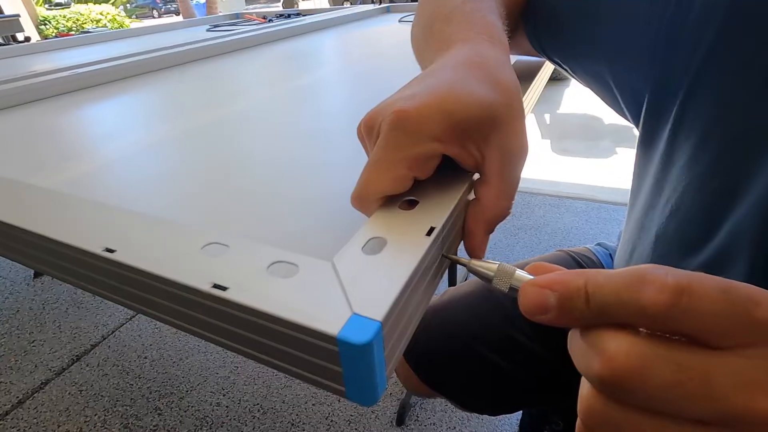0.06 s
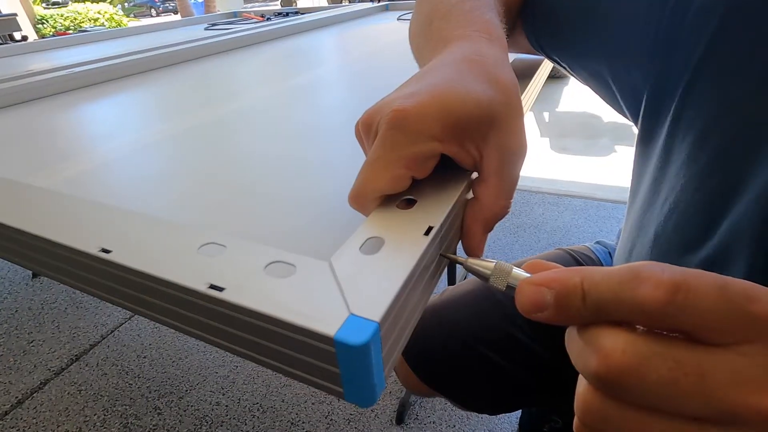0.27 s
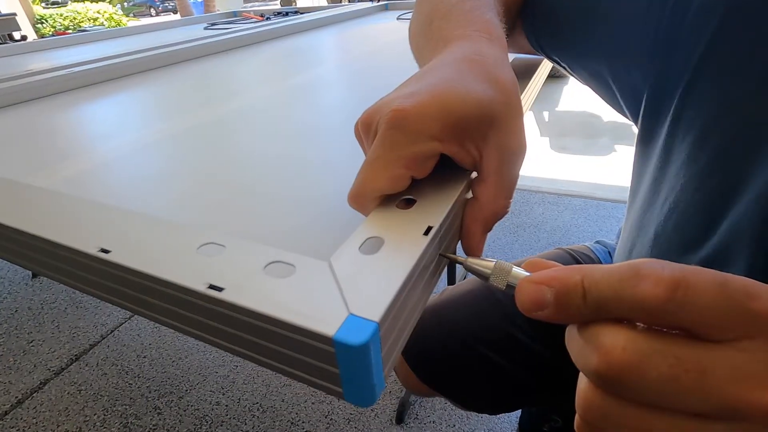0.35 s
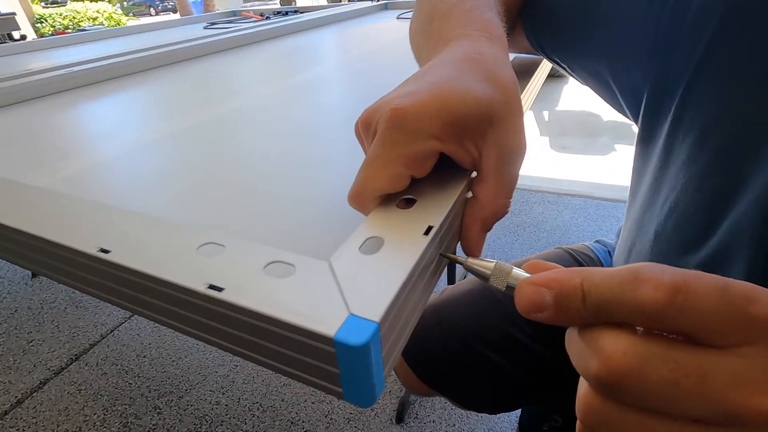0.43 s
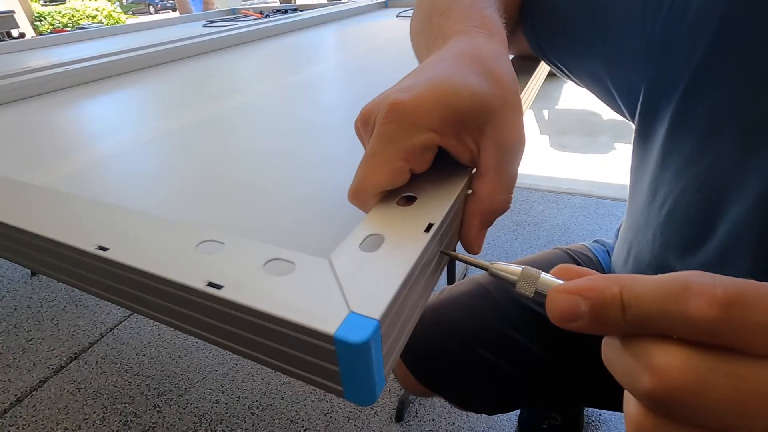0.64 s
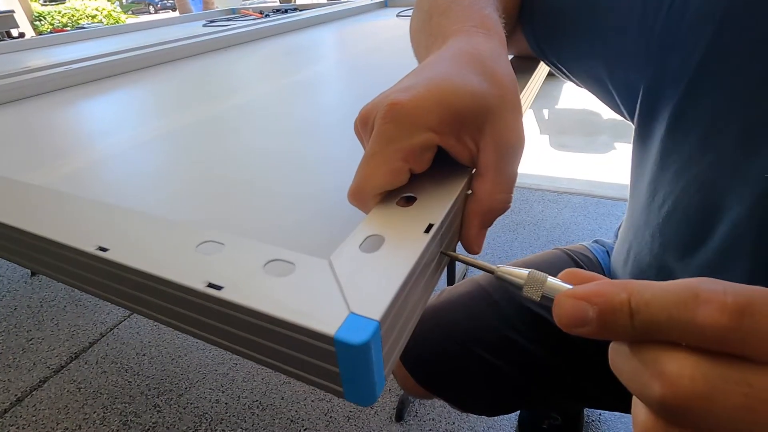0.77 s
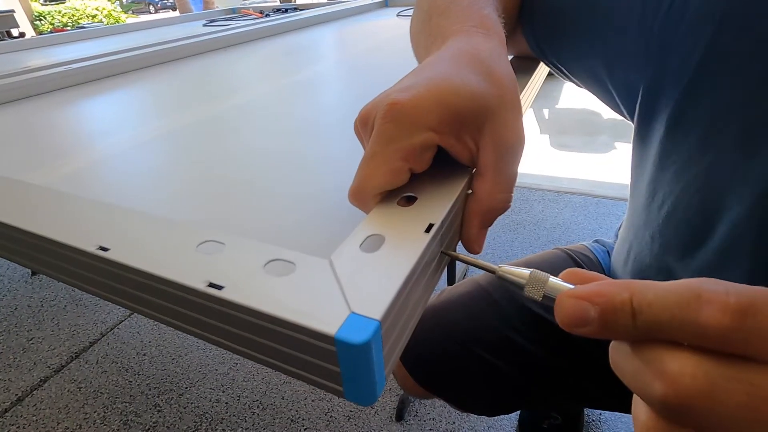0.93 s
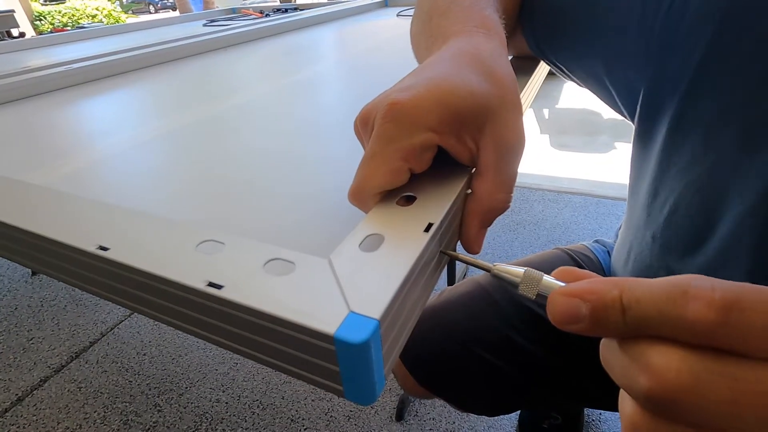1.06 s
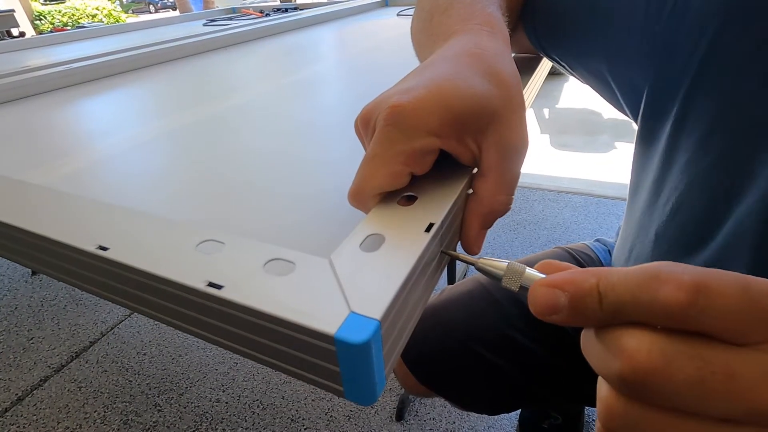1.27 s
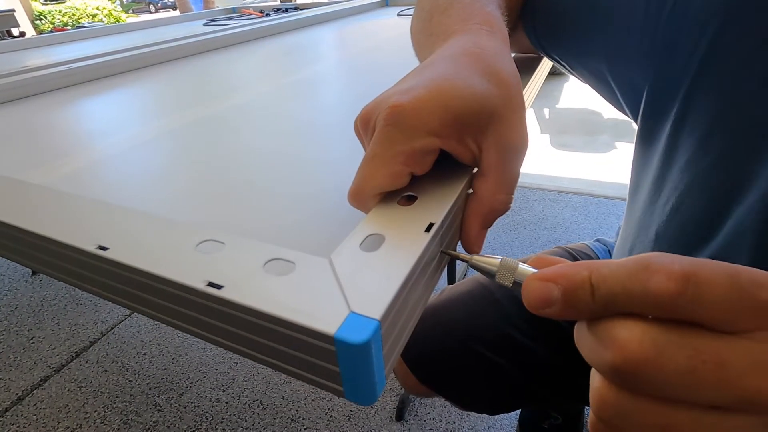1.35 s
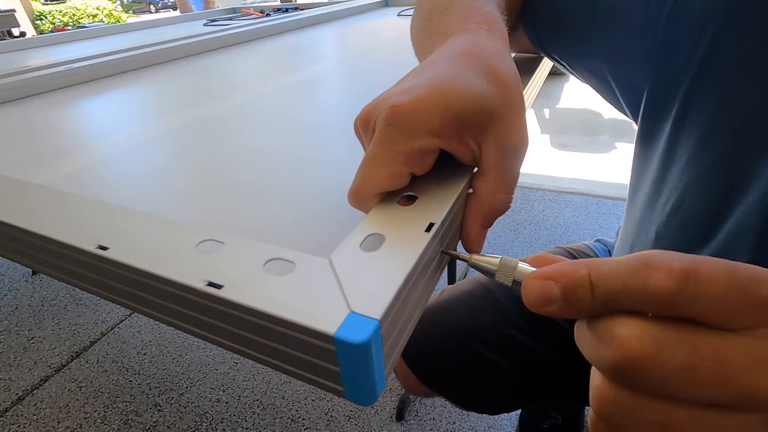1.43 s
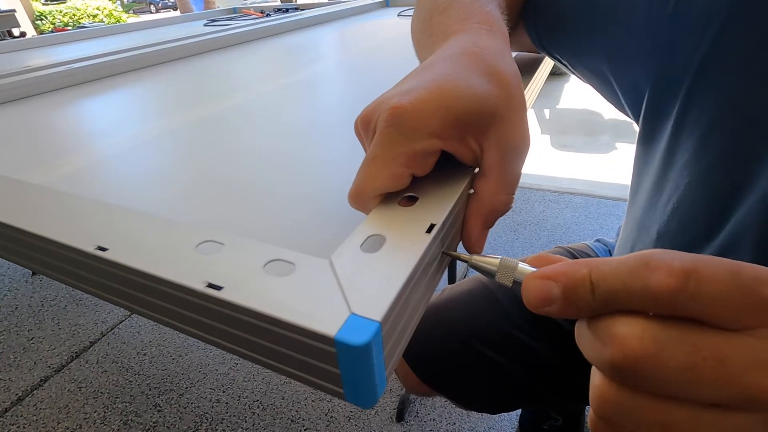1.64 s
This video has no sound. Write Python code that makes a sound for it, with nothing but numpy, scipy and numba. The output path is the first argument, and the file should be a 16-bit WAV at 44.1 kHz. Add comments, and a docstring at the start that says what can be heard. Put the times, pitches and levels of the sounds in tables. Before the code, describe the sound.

Very close, in a garage with faint outdoor noise: a brief metallic bite, an explosive punch snap and ringing frame, then the steel tip clicks and slides lightly, with a sharp knock later and scattered taps.

```python
"""In a garage, a spring-loaded centre punch is pressed against an aluminium frame, close to the microphone.
The tip taps and bites, the spring snaps and the frame rings; then the tip slips, scrapes and taps again.
Blows are short noise bursts and dying tones, slides are grainy noise, and a panel hums low.
Faint outdoor noise lies behind. The recorder clips on the snap, ducks, and recovers as the ring dies."""
import sys
import numpy as np
from scipy import signal
from scipy.fft import rfft, irfft
from scipy.io import wavfile
from scipy.ndimage import uniform_filter1d
from numba import njit

SR = 44100
rng = np.random.default_rng(int(sys.argv[2]) if len(sys.argv) > 2 else 0)


def master(y):
    """Save y as 16-bit WAV."""
    cut = np.clip(np.atleast_2d(y).T, -1, 1)
    pcm = np.round(cut * 32767)  # scale
    wavfile.write(sys.argv[1], SR, pcm.astype(np.int16))


N = 74970  # length in samples, 1.7 s

# Levels in dB are relative: other levels and filters may add to them.
# A t60 is the time in which a sound dies away by 60 dB.

# Blows of the punch mechanism; the last is the hammer itself.
# Each row: start in seconds, level in dB, treble in dB.
SNAP_BLOWS = [(0.206, -19, -3), (0.2174, -7.5, -3.5), (0.2264, 4, -10.5), (0.2275, 10.5, 3)]
# The tip biting in as the spring loads. Each row: time in seconds, level in dB.
BITE_LEVEL = [(0.189, -56), (0.2053, -36), (0.208, -32), (0.216, -23.5), (0.217, -17.5), (0.227, -19),
              (0.23, -30.5)]
# The frame flexing as the load peaks. Each row: frequency in Hz, level in dB.
FLEX_TONES = [(160, -13), (328, -22.5), (885, -20.5)]
# Frame resonances under the pressed punch. Each row: frequency in Hz, level in dB, t60 in seconds.
PRESSED_MODES = [(500, -11.5, 0.063), (610, -9, .05), (710, -6, .05), (871, -3, 0.066), (1190, 1.5, .04),
                 (1537, 4, 0.067), (1737, 5, 0.05), (1860, 2, .035), (2440, 0.5, 0.019),
                 (2907, -1.5, 0.032), (3052, 3.5, .04), (3230, 4.5, 0.033), (3986, -3, .04),
                 (4307, 2, 0.035), (4577, -2, 0.045)]
# Long rings of the frame and spring. Each row: frequency in Hz, level in dB, t60 in seconds.
RING_MODES = [(230.5, -2.5, 0.43), (1201, 3.5, .45), (1390, -4.5, 0.34), (1490, -5, .6), (1730, -4.5, 1),
              (1920, 0.5, .6), (2170, -2, .6), (2545, 2, 1), (2955, -3.5, 0.45), (3240, -5, .7),
              (3520, 0.5, 0.46), (4075, -2, 0.79), (5410, -2, 0.48)]
# The hardest blows, which set the coil spring shimmering.
# Each row: start in seconds, level in dB, top-octave level in dB.
SPRING_BLOWS = [(0.227, 9.5, 0.5), (0.7526, -22, 8.5), (1.0716, -11.5, -21)]
# Clear tones of the coil. Each row: frequency in Hz, level in dB, t60 in seconds.
COIL_MODES = [(5310, -43.5, 0.48), (5520, -37.5, 0.49)]
# Taps of the steel tip on the frame. Each row: start in seconds, level in dB, treble in dB,
# rattle in dB, ring in dB, favoured tone in Hz, tone level in dB, tone t60 in seconds.
TIP_TAPS = [(0.119, -33, 12.5, 5.5, 10.5, 1966, -1.5, 0.32), (0.127, -39.5, -4, 8, -17, 876, 2.5, 0.17),
            (0.185, -32, 10, -1, 12, 3640, -3, 0.022), (0.567, -22.5, 6, 1, -19, 1280, -22, 0.056),
            (0.5808, -21.5, 1.5, 4, -9, 1560, -25, .02), (0.59, -12.5, 0, 2, -4.5, 1190, -13, 0.069),
            (0.5977, -28.5, -18, -17, 22.5, 901, 1, 0.05), (0.6994, -27.5, -13.5, 2.5, 11, 1740, -8, 0.03),
            (0.7525, -22.5, 15, 5.5, -16, 2834, 0, 0.017), (0.7532, -21.5, 0, 3.5, 7.5, 1817, 8.5, 0.045),
            (0.7597, -23, -7, -3, 3.5, 944, -1.5, 0.05), (0.91, -22.5, -22, -2, 2.5, 1580, -22, 0.018),
            (1.0722, -1.5, -3.5, -5, -2, 1368, -18, 0.021), (1.0756, -20, 0.5, -3, -20, 5340, 8, 0.022),
            (1.2210, -23, -4, -1, -7, 1335, -9.5, 0.097), (1.2408, -26.5, -17.5, 5, -1, 1570, -31, .05),
            (1.3218, -20, -5.5, 5, -6.5, 3350, 0.5, 0.057), (1.3901, -21, -10, -4.5, 10, 1440, -8.5, 0.049),
            (1.4110, -28, -4.5, 8, 7.5, 3740, 7, 0.019), (1.4190, -17, -4.5, 4, -15, 4020, 2, 0.027),
            (1.4216, -14.5, -28, -2.5, 1, 1567, -3.5, 0.052), (1.4235, -28, -25, 4, -2, 652, -5.5, 0.076),
            (1.4320, -23, -4.5, 6.5, -4, 1355, -1.5, 0.098), (1.642, -37, -47, -13, -11, 1524, -34, 0.032)]
# Brief resonances at the point of a tap. Each row: frequency in Hz, level in dB, t60 in seconds.
CONTACT_MODES = [(924, -27.5, 0.031), (1172, -13.5, 0.022), (1494, -2, .012), (1880, -4.5, 0.0084),
                 (2400, -42, 0.0061), (3000, -23, 0.0083), (3630, -19, 0.018), (4658, -13, 0.021),
                 (5380, -15.5, 0.02), (6430, -14, 0.012)]
# The tip sliding on the frame. Each row: middle in seconds, half length in seconds, level in dB.
TIP_SLIDES = [(0.58, 0.021, -40), (0.647, 0.019, -46.5), (0.721, 0.025, -39.5), (1.088, 0.026, -45),
              (1.18, 0.012, -44), (1.223, 0.016, -37), (1.307, 0.026, -44), (1.357, 0.033, -44.5),
              (1.415, 0.019, -42), (1.452, 0.009, -38)]
# Low tones of the wide panel. Each row: frequency in Hz, level in dB, t60 in seconds.
PANEL_MODES = [(162, -48.5, 0.46), (237.7, -39.5, 0.29), (275.7, -55, .2)]
# Jolts that set the panel humming. Each row: start in seconds, level in dB.
JOLTS = [(.268, 12), (.585, -6)]
# Level of the background noise. Each row: time in seconds, level in dB.
AIR_LEVEL = [(0, -52), (0.148, -53), (.5, -63), (0.982, -64), (1.2, -55.5), (1.52, -54.5), (1.7, -59.5)]

# Tone colours: how loud each pitch region is. Each row: frequency in Hz, gain in dB.
# Crunch of the bite
BITE_SHAPE = [(50, -31), (110, 0), (170, -0.5), (400, -10.5), (600, 4.5), (1100, -25.5), (1700, -2),
              (2400, -14.5), (3200, -4), (4400, -6), (5600, -19), (8800, -20.5), (10700, -18),
              (15000, -32.5)]
# Crack of a snap
CRACK_SHAPE = [(60, -47), (200, -14.5), (700, -3), (1600, 9), (4400, -1), (6500, -0.5), (8000, -20),
               (11000, -20), (16000, -29)]
# Wash of the frame's long ring
RING_SHAPE = [(60, -14.5), (170, -6.5), (400, -12), (750, -10), (1200, 3.5), (1800, 2.5), (3300, 1),
              (4400, -0.5), (4950, -12.5), (5450, -2), (6000, -6), (7000, -7.5), (8900, -29.5),
              (11000, -22.5), (13500, -39.5), (15000, -77)]
# Shimmer of the coil spring
SPRING_SHAPE = [(2500, -32), (4900, -9.5), (5500, 0), (6400, -4.5), (7300, -9.5), (8900, -28.5),
                (11100, -13.5), (13000, -24.5), (15000, -51)]
# Rattle of the punch's loose parts
RATTLE_SHAPE = [(100, -30), (500, -26.5), (850, -6.5), (1000, -3.5), (1600, 7.5), (2400, 3), (3400, 3.5),
                (4500, -13.5), (6800, -9.5), (8800, -28), (11000, -19), (15000, -51)]
# All taps together
TAP_SHAPE = [(60, -22), (500, 3.5), (1500, -2.5), (7000, -8.5), (8900, -7.5), (11000, -5.5), (13000, -4),
             (15000, -25.5)]
# Sliding tip
SCRAPE_SHAPE = [(100, -32.5), (500, -13), (800, -11.5), (1150, 0.5), (1500, 4), (1900, 2.5), (2500, -12.5),
                (3800, -15.5), (7000, -54), (12000, -51), (14500, -89)]
# Rumble of the panel
PANEL_SHAPE = [(60, -26), (150, -8), (260, -2), (520, -0.5), (900, -32)]
# Background noise
AIR_SHAPE = [(18, -53), (30, -20), (247, -3), (524, -13), (680, -8), (859, -14.5), (1480, -17), (4090, -20),
             (6700, -26.5), (9150, -47), (11600, -35.5), (15000, -66)]
# Difference between the left and right sides
WIDTH_SHAPE = [(100, -24), (1200, -36), (4000, -21.5), (8000, -11.5), (11000, 17), (15000, 27)]

# Bite: ring level, unevenness of its grains, then spread and averaging time of the small slips
BITE_RING_DB, BITE_GRAIN, SLIP_DB, SLIP_S = -1, 0.21, 3, 0.0012
FLEX_S, FLEX_HALF_S = 0.225, 0.0095  # middle and half length of the flexing
CRACK_DB, CRACK_T60_S, PRESSED_DB = 8, 0.013, -22
THUD_HZ, THUD_DB, THUD_T60_S = 168, -10, 0.028
SNAP_RING_DB = 12.5
RECOIL_DB, RECOIL_HALF_S = -31, 0.0014  # the deep push of the hammer's recoil
LOW_CUT_HZ = 193
WASH_DB, WASH_T60_S, WASH_TREBLE_T60_S, RINGS_DB = 4, 0.58, 0.62, -46
SPRING_T60_S = 0.25
RATTLE_DB, RATTLE_T60_S = 13.5, 0.05
TONE_Q = 9.4  # sharpness of each filter that makes a tap's cluster of tones
SCRAPE_GRAIN = 0.67
PANEL_RUMBLE_DB, PANEL_T60_S, PANEL_SWELL_S = -11.5, 0.19, 0.0092
WIDTH_DB, SIDE_LAG_S = -29, 0.002
# Limiter: threshold in dB below full scale, time constant of the duck, speed of the recovery
LIMIT_DB, DUCK_S, RECOVER_DB_PER_S = -8, 0.0044, 82
TOP_HZ = 15500


def undb(db):
    """Turn decibels into gain."""
    return 10 ** (np.asarray(db) / 20)


def clock():
    """Time of each sample in seconds."""
    return np.arange(N) / SR


def fade(t60):
    """Die away smoothly, by 60 dB in t60 seconds."""
    return np.exp(-np.log(1000) * clock() / t60)


def bump(middle, half):
    """Swell and sink in a smooth bell shape."""
    return np.exp(-0.5 * ((clock() - middle) / half) ** 2)


def unit(x):
    """Scale to an energy of one."""
    return x / np.sqrt(np.sum(x ** 2))


def steady(x):
    """Scale to an average strength (standard deviation) of one."""
    return x / np.std(x)


def delay(x, at):
    """Start a sound at the given time."""
    return np.concatenate([np.zeros(int(at * SR)), x])[:N]


def through(x, response):
    """Pass a sound through something that rings with the given response."""
    return signal.fftconvolve(x, response)[:N]


def colour(x, points):
    """Filter to the given shape, with no sound ahead of its cause."""
    hz, db = np.array(points, float).T
    size = 2048
    freqs = np.maximum(np.fft.rfftfreq(size, 1 / SR), 1)
    gain = undb(np.interp(np.log(freqs), np.log(hz), db))
    # Folding the cepstrum (the spectrum of the log gain) puts the filter's energy as early as possible.
    cepstrum = irfft(np.log(gain))
    cepstrum[1:size // 2] *= 2
    cepstrum[size // 2 + 1:] = 0
    return through(x, irfft(np.exp(rfft(cepstrum))))


def noise(points, grain=0):
    """Coloured noise; grain makes it a crowd of uneven tiny clicks."""
    hiss = rng.standard_normal(N)
    unevenness = np.exp(grain * rng.standard_normal(N))
    return steady(colour(hiss * unevenness, points))


def burst(points, t60):
    """A dying burst of noise, like a cloud of dense resonances."""
    return unit(colour(rng.standard_normal(N) * fade(t60), points))


def modes(table):
    """Dying sine tones, each starting in the opposite direction to the one before."""
    total = 0
    for k, (hz, db, t60) in enumerate(table):
        total = total + (-1) ** k * undb(db) * np.sin(2 * np.pi * hz * clock()) * fade(t60)
    return total


def strike(response, at, db, treble_db, soft_hz=1700, hard_hz=5500):
    """One blow; a harder contact lifts the treble."""
    return delay(undb(db) * colour(response, [(soft_hz, 0), (hard_hz, treble_db)]), at)


def bite():
    """The tip crunches into the metal in many small slips while the pressed frame resonates."""
    crunch = noise(BITE_SHAPE, BITE_GRAIN)
    frame = steady(through(rng.standard_normal(N), modes(PRESSED_MODES)))
    crunch = crunch + undb(BITE_RING_DB) * frame
    wander = steady(uniform_filter1d(rng.standard_normal(N), max(int(SLIP_S * SR), 1)))
    slips = undb(SLIP_DB * wander)
    crunch = crunch * slips / np.sqrt(np.mean(slips ** 2))
    times, levels = np.array(BITE_LEVEL).T
    return crunch * undb(np.interp(clock(), times, levels, left=-np.inf, right=-np.inf))


def flexing():
    """The frame bends as the load peaks, heard as a short swell of tones."""
    tones = sum(undb(db) * np.sin(2 * np.pi * hz * clock()) for hz, db in FLEX_TONES)
    return tones * bump(FLEX_S, FLEX_HALF_S)


def punch(ring):
    """The tip bites into the flexing metal; the released hammer thuds and sets the frame ringing."""
    out = bite() + flexing()
    for at, db, treble_db in SNAP_BLOWS:
        crack = undb(CRACK_DB) * burst(CRACK_SHAPE, CRACK_T60_S)
        crack = crack + undb(PRESSED_DB) * modes(PRESSED_MODES)
        out = out + strike(crack, at, db, treble_db)
    hammer_s, hammer_db, _ = SNAP_BLOWS[-1]
    thud = modes([(THUD_HZ, hammer_db + THUD_DB, THUD_T60_S)])
    out = out + delay(thud + undb(SNAP_RING_DB) * ring, hammer_s)
    low_cut = signal.butter(3, LOW_CUT_HZ, "high", fs=SR, output="sos")
    # The recoil skips the low cut, so its deep push survives.
    recoil = undb(RECOIL_DB) * bump(hammer_s, RECOIL_HALF_S)
    return recoil + signal.sosfilt(low_cut, out)


def frame_ring(split_hz=3500):
    """The long ring of frame and garage: a dense wash of noise with a few clear tones."""
    wash = rng.standard_normal(N)
    low_pass = signal.butter(2, split_hz, fs=SR, output="sos")
    low = signal.sosfiltfilt(low_pass, wash)
    treble = wash - low
    wash = colour(low * fade(WASH_T60_S) + treble * fade(WASH_TREBLE_T60_S), RING_SHAPE)
    return undb(WASH_DB) * unit(wash) + undb(RINGS_DB) * modes(RING_MODES)


def spring():
    """Hard blows shake the coil spring: dense high tones shimmer and two sing out."""
    out = 0
    for at, db, top_db in SPRING_BLOWS:
        shimmer = burst(SPRING_SHAPE, SPRING_T60_S) + modes(COIL_MODES)
        out = out + strike(shimmer, at, db, top_db, soft_hz=7060, hard_hz=10500)
    return out


def tone_cluster(hz):
    """Close tones around one pitch, made by narrowing noise twice."""
    b, a = signal.iirpeak(hz, TONE_Q, fs=SR)
    narrow = signal.lfilter(b, a, rng.standard_normal(2 * N))
    narrow = signal.lfilter(b, a, narrow)
    return steady(narrow[N:])  # the first half only lets the filters settle


def taps(ring):
    """The tip knocks on the frame; each spot favours some close tones, and loose parts rattle briefly."""
    contact, out = modes(CONTACT_MODES), 0
    for at, db, treble_db, rattle_db, ring_db, tone_hz, tone_db, tone_t60 in TIP_TAPS:
        rattle = undb(RATTLE_DB + rattle_db) * burst(RATTLE_SHAPE, RATTLE_T60_S)
        tone = undb(tone_db) * tone_cluster(tone_hz) * fade(tone_t60) / 2
        knock = contact + rattle + tone + undb(ring_db) * ring
        out = out + strike(knock, at, db, treble_db)
    return colour(out, TAP_SHAPE)


def scrapes(ring, ring_db=-9):
    """The tip sticks and slips in short slides, as grainy noise that also stirs the frame's ring."""
    pressure = sum(undb(db) * bump(at, half) for at, half, db in TIP_SLIDES)
    slide = noise(SCRAPE_SHAPE, SCRAPE_GRAIN) * pressure
    return slide + undb(ring_db) * np.std(slide) * steady(through(slide, ring))


def panel():
    """The wide panel answers jolts: low tones and a rough rumble swell up, then die away."""
    hum = modes(PANEL_MODES) + undb(PANEL_RUMBLE_DB) * burst(PANEL_SHAPE, PANEL_T60_S)
    hum = hum * (1 - np.exp(-clock() / PANEL_SWELL_S))
    return sum(undb(db) * delay(hum, at) for at, db in JOLTS)


def air():
    """Faint outdoor noise through the open garage door, at a slowly changing level."""
    times, levels = np.array(AIR_LEVEL).T
    return noise(AIR_SHAPE) * undb(np.interp(clock(), times, levels))


def scene():
    """Everything is straight ahead; the sides differ mostly in the highest treble."""
    ring = frame_ring()
    mid = punch(ring) + spring() + panel() + taps(ring) + scrapes(ring) + air()
    side = undb(WIDTH_DB) * colour(delay(mid, SIDE_LAG_S), WIDTH_SHAPE)
    return np.array([mid + side, mid - side])


@njit
def duck(over, attack, recover):
    """Gain reduction in dB: follows overloads quickly and lets go at a steady rate."""
    out, held, cut = np.zeros(len(over)), 0., 0.
    for i in range(len(over)):
        held = max(over[i], held - recover, 0.)
        cut += (held - cut) * attack
        out[i] = cut
    return out


def record(dry):
    """A limiter turns loud sound down with a short lag; peaks past full scale clip, and the top is cut."""
    peak = np.abs(dry).max(axis=0)
    over = 20 * np.log10(peak + np.finfo(float).eps) - LIMIT_DB
    cut = duck(over, 1 - np.exp(-1 / (DUCK_S * SR)), RECOVER_DB_PER_S / SR)
    loud = np.clip(dry * undb(-cut), -1, 1)
    top_cut = signal.ellip(8, 0.2, 80, TOP_HZ, fs=SR, output="sos")
    return signal.sosfilt(top_cut, loud)


dry = scene()
out = record(dry)
master(out)
```